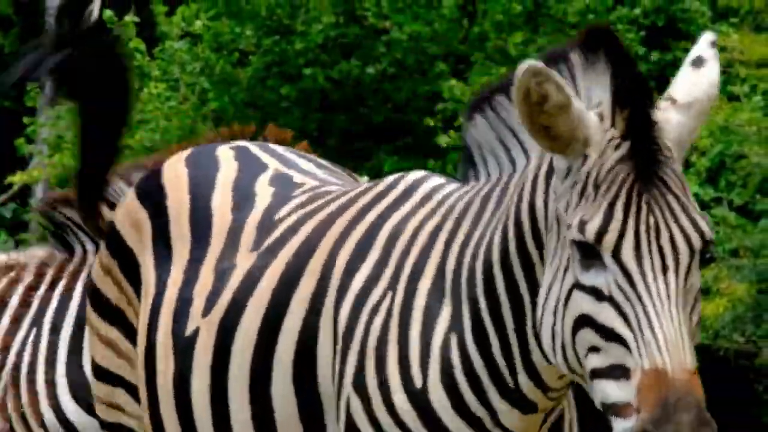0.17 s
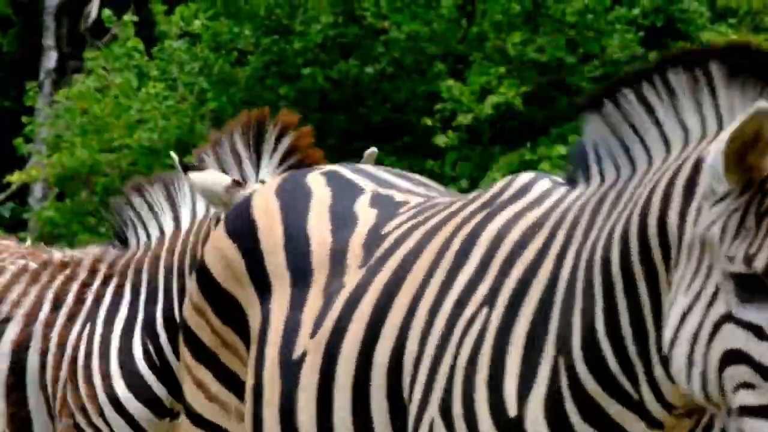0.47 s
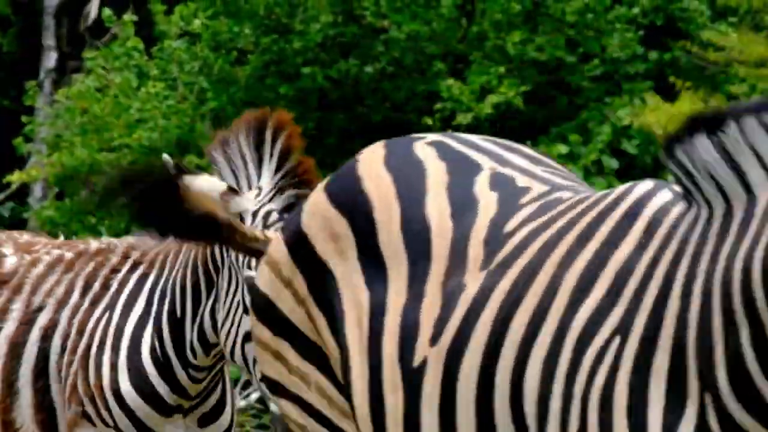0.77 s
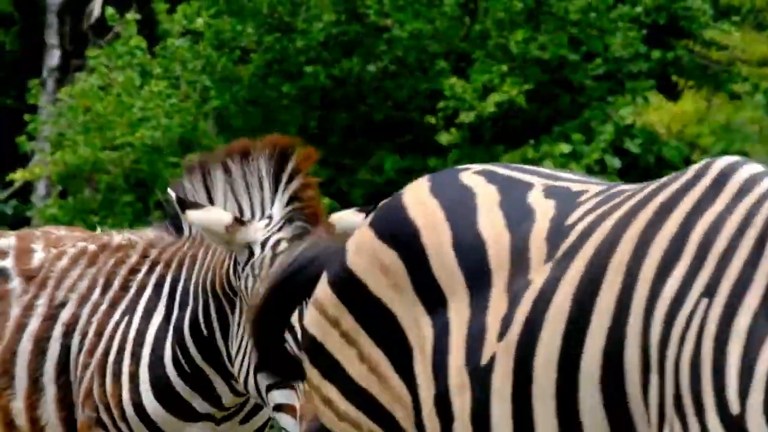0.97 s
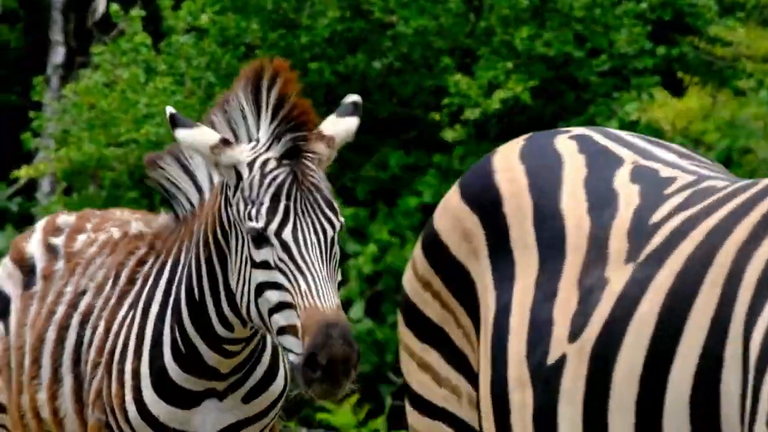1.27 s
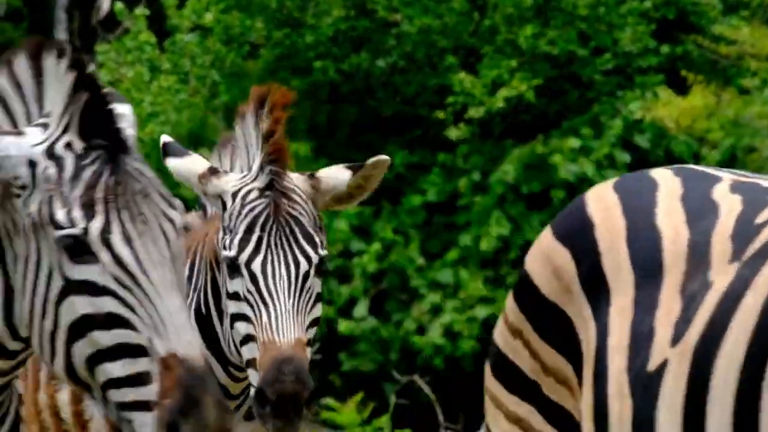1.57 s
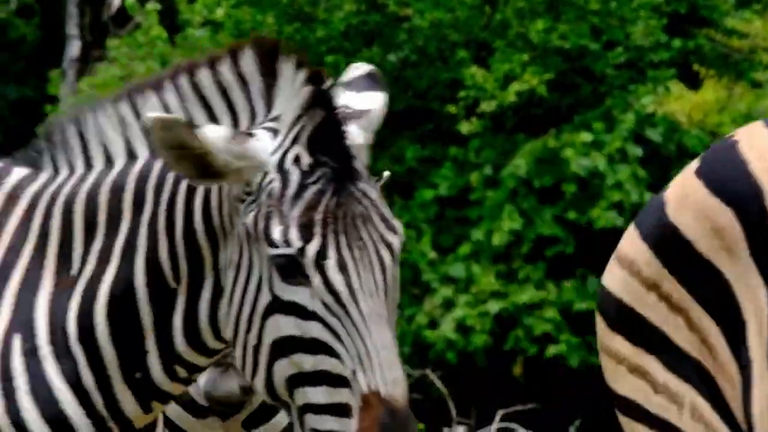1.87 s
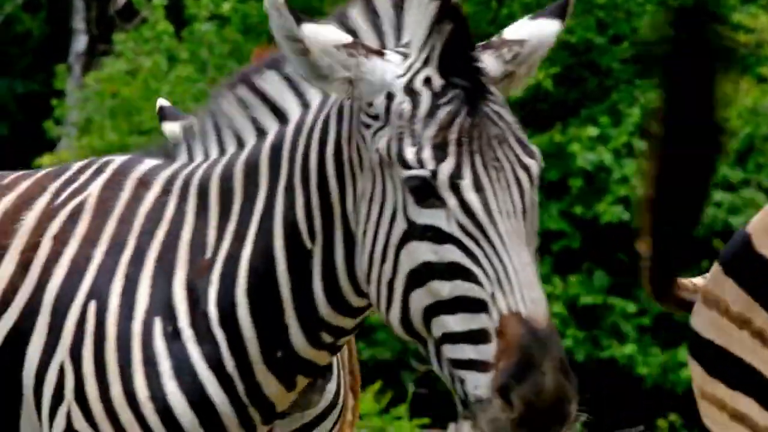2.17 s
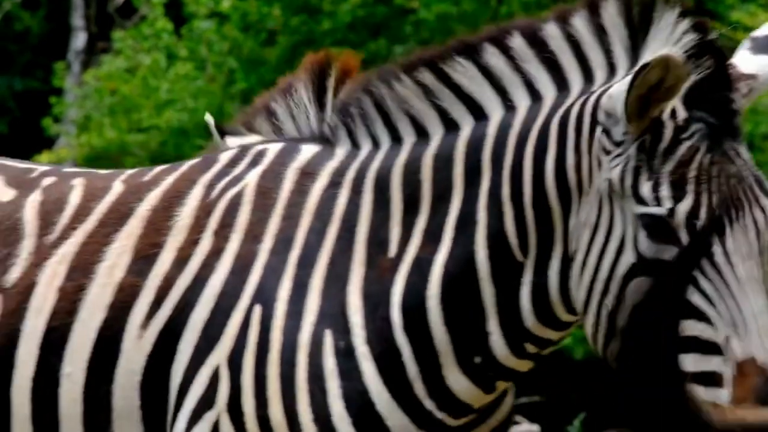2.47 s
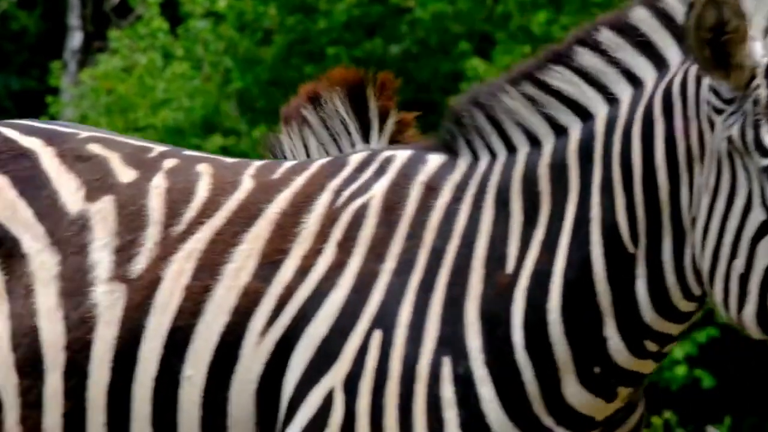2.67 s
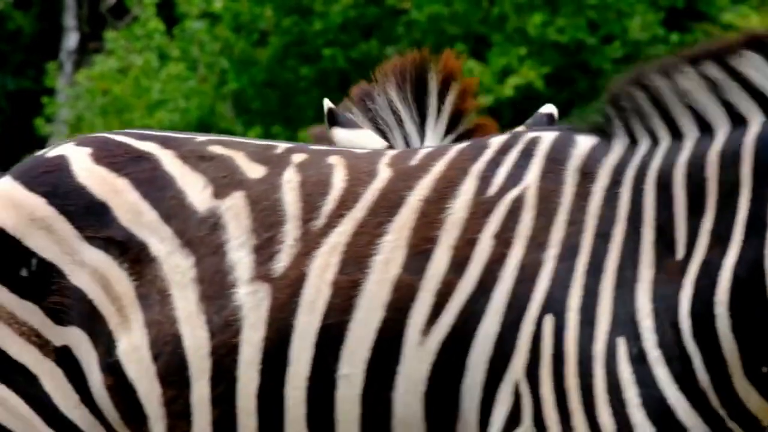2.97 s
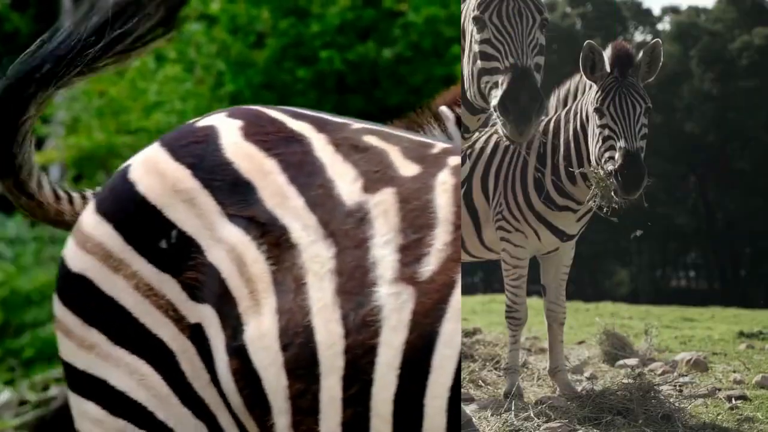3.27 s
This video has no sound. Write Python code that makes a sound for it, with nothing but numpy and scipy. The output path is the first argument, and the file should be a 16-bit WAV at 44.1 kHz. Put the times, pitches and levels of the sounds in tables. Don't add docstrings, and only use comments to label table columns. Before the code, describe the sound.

Two zebras exchange quick whooping yelps from the start almost to the end, with short breathy pauses and tiny low grunts. Fairly close stereo microphone outdoors, soft wide rustle and hiss, distant chirps, little bass.

```python
import sys
import numpy as np
from scipy import signal
from scipy.fft import rfft, irfft, next_fast_len
from scipy.io import wavfile
from scipy.ndimage import uniform_filter1d, map_coordinates

SR = 44100
rng = np.random.default_rng(int(sys.argv[2]) if len(sys.argv) > 2 else 0)


def persist_wave(psi):
    counts = np.round(np.clip(psi, -1, 1) * 32767).astype(np.int16)
    wavfile.write(sys.argv[1], SR, np.atleast_2d(counts).T)


def invert_db(level):
    return 10 ** (np.asarray(level, dtype=float) / 20)


N = 152145


def unit(x):
    return x / np.sqrt(np.mean(x ** 2) + 1e-20)


def along(points, hz):
    f, v = np.transpose(points)
    return np.interp(np.log(hz + 1), np.log(f + 1), v)


def wobble(rate_hz):
    knots = rng.standard_normal(int(N * rate_hz / SR) + 4)
    return map_coordinates(knots, [np.arange(N) * rate_hz / SR])


def filtered(x, response):
    m = next_fast_len(N + SR // 2)
    return irfft(rfft(x, m) * response(np.fft.rfftfreq(m, 1 / SR)), m)[..., :N]


def noise(spectrum):
    return unit(filtered(rng.standard_normal(N), lambda hz: invert_db(along(spectrum, hz))))


def glides(rows, flutter):
    t, out, shake = np.arange(N) / SR, np.zeros(N), wobble(150)
    for start_s, length_s, hz0, hz1, db in rows:
        u = np.clip((t - start_s) / length_s, 0, 1)
        pitch_hz = (hz0 + (hz1 - hz0) * u) * (1 + flutter * shake)
        phase = 2 * np.pi * np.cumsum(pitch_hz) / SR
        out += invert_db(db + 7.5) * np.sin(np.pi * u) ** 0.15 * np.sin(phase)
    return out


def leaves():
    # hz, density_db
    rustle_colour = [(59, -68.5), (100, -13.5), (327, -11.5), (662, -15), (982, -8.5), (1650, -12.5),
                     (3950, -17), (8690, -26), (14300, -18)]
    # hz, left_right_likeness
    likeness = [(200, 0.94), (2000, 0.94), (4000, 0.052), (8000, 0.085), (13000, .7)]
    level_db, hiss_left_db = -50.5, -1

    def mid_side(hz):
        turn = np.arccos(np.clip(along(likeness, hz), -1, 1)) / 2
        return invert_db(along(rustle_colour, hz)) * [np.cos(turn), np.sin(turn)]

    def hiss_balance(hz):
        return invert_db(np.outer([.5, -.5], hiss_left_db * (hz > 7000)))

    mid, side = filtered(rng.standard_normal((2, N)), mid_side)
    pair = filtered(np.array([mid + side, mid - side]), hiss_balance)
    return invert_db(level_db + wobble(6.0)) * unit(pair)


def birds():
    # start_s, length_s, start_hz, end_hz, level_db
    chirps = [(0, .12, 3550, 3000, -66), (.2, .03, 5400, 5200, -62), (.9, .04, 4800, 4500, -62),
              (.83, .04, 4400, 4600, -64), (.165, .05, 3000, 2995, -58), (.545, .1, 5600, 4100, -57),
              (1.64, .085, 5500, 3850, -55), (1.915, .022, 5150, 4650, -59), (1.937, .047, 4750, 3900, -58),
              (3.2, .03, 6200, 5100, -65), (3.228, .072, 5000, 3950, -53), (3.318, .022, 4950, 4550, -57),
              (3.34, .045, 4600, 3900, -57), (.06, .06, 4700, 4000, -62), (3.265, .05, 3700, 3400, -58),
              (3.3, .06, 3200, 2900, -62), (3.37, .06, 2950, 3050, -64), (1.93, .008, 4200, 3100, -56)]
    smear_t60_s, direct = .16, .55
    t = np.arange(SR // 5) / SR
    smear = rng.standard_normal((2, len(t))) * invert_db(-60 * t / smear_t60_s)
    paths = smear / np.linalg.norm(smear[0]) + direct * (t == 0)
    song = glides(chirps, flutter=.016)
    return signal.fftconvolve(song[None], paths, axes=1)[:, :N] * invert_db([[.5], [-1]])


def air_bursts(rows, spectrum):
    t = np.arange(N) / SR
    swell = sum(invert_db(db) * np.sin(np.pi * np.clip((t - start_s) / length_s, 0, 1))
                for start_s, length_s, db in rows)
    return swell * invert_db(2.8 * wobble(52)) * noise(spectrum)


def huffs():
    # start_s, length_s, level_db
    puffs = [
        (.55, 0.11, -44.5),
        (1.84, 0.089, -48),
        (2.2, 0.087, -59.5),
    ]
    # hz, level_db
    puff_colour = [(80, -28), (130, -6), (300, 6), (500, -7.5), (900, -40)]
    return air_bursts(puffs, puff_colour)


def breaths():
    # start_s, length_s, level_db
    gasps = [(0, 0.15, -55), (.53, 0.082, -51), (0.32, 0.088, -41.5), (2.14, 0.11, -51.5),
             (2.98, 0.087, -48.5), (0.776, .18, -46.5), (1.15, 0.076, -40.5), (1.817, 0.28, -42.5),
             (2.39, 0.2, -46), (2.665, 0.16, -53.5), (3.274, 0.11, -46.5)]
    # hz, level_db
    gasp_colour = [(100, -47), (250, -6.5), (700, -2), (1000, -4), (1700, 2), (2250, -0.5), (2800, -38.5),
                   (5000, -53.5)]
    return air_bursts(gasps, gasp_colour)


def grunts():
    # start_s, length_s, start_hz, end_hz, level_db
    grunt_notes = [(1.41, 0.016, 200, 220, -45.5), (1.44, 0.044, 333, 344, -46.5),
                   (2.252, 0.016, 231, 242, -46.5), (2.27, 0.055, 356, 348, -46),
                   (3.09, 0.012, 204, 228, -43.5), (3.115, 0.051, 372.3, 324, -45.5),
                   (.07, 0.051, 2178, 2220, -47), (.74, .27, 213, 199.2, -66.5),
                   (1.215, 0.012, 470, 522, -34), (2.77, 0.027, 437.7, 464, -39),
                   (2.012, 0.026, 446, 339, -44)]
    return glides(grunt_notes, flutter=0.0022)


def register(rows, bend, start_db, end_db, bright_db, hoarse_db, sag):
    # hz, level_re_fundamental_db
    overtone_levels = [(900, -19.5), (1500, -27), (2000, -19.5), (2450, -25.5), (2800, -32.5), (3300, -33),
                       (5000, -50.5)]
    # hz, level_db
    hoarse_colour = [(100, -66.5), (200, -7), (700, -3), (1500, 4.5), (2400, -15), (3200, -17.5),
                     (5000, -45), (7000, -82.5)]
    # from_s, to_s, extra_octave_db, extra_noise_db
    strained = [(.21, .25, 13, 3), (.25, .3, 18, 3), (.3, .33, 10, 0), (.33, .36, 8, 2), (.5, .56, 4, 14),
                (1.19, 1.3, 0, 8), (1.39, 1.46, 0, 7), (1.81, 1.83, 0, 12), (2, 2.03, 0, 9),
                (2.04, 2.06, 0, 7), (2.1, 2.15, 6, 8), (2.23, 2.4, 0, 9), (2.6, 2.63, 6, 5),
                (2.76, 3.03, 0, 8), (3.06, 3.12, 0, 9)]
    edge_s, jitter_depth, shimmer_db, breakup_db, fourth_db = .007, .006, 32, 4, -12
    out, rasp = np.zeros(N), noise(hoarse_colour)
    jitter, shimmer, breakup = wobble(150), wobble(70), wobble(110)
    for start_s, length_s, hz0, hz1, db in rows:
        strains = [(octave, rough) for t0, t1, octave, rough in strained if t0 < start_s < t1]
        octave_db, rough_db = np.sum(strains + [(0, 0.0047)], axis=0)
        t = np.arange(int((length_s + 2.26 * edge_s) * SR)) / SR
        u = t / length_s
        first = int(start_s * SR)
        cut = slice(first, first + len(t))

        glide_hz = hz0 + (hz1 - hz0) * np.expm1(-bend * u) / np.expm1(-bend)
        pitch_hz = glide_hz * (1 - sag * u ** 3 + jitter_depth * invert_db(rough_db) * jitter[cut])
        phase = 2 * np.pi * np.cumsum(pitch_hz) / SR

        overtones = np.zeros(len(t))
        for k in range(2, 5):
            extra_db = octave_db * (k == 2) + fourth_db * (k == 4)
            overtones += invert_db(along(overtone_levels, k * pitch_hz) + extra_db) * np.sin(k * phase + k)
        dull_onset_db = 0.7 * start_db * np.clip(1 - u, 0, 1) ** 2
        tone = np.sin(phase) + invert_db(bright_db + dull_onset_db + breakup_db * breakup[cut]) * overtones

        gate = (1 + 0.74 * np.sin(phase)) * np.sin(np.pi * t / t[-1])
        voice = np.sqrt(2) * tone + invert_db(hoarse_db + rough_db) * gate * 1.56 * rasp[cut]

        edge = np.sin(np.pi / 2 * np.clip(np.minimum(t, (t[-1] - t) / 2) / edge_s, 0, 1)) ** 2
        onset_db = start_db * np.clip(1 - 2.5 * u, 0, 1)
        dips_db = shimmer_db * invert_db(hoarse_db + rough_db / 2) ** 0.58 / 4 * shimmer[cut] ** 2
        out[cut] += edge * invert_db(db + onset_db + end_db * u ** 2 - dips_db) * voice
    return out


def barks():
    # start_s, length_s, start_hz, end_hz, peak_db
    chest = [(.214, 0.051, 511, 869, -27), (.376, 0.048, 580.5, 814, -22.5), (.597, 0.06, 437.6, 894, -21),
             (1.006, 0.046, 471.5, 845, -23.5), (1.186, 0.034, 550, 853, -27.5),
             (1.21, 0.037, 718, 705.7, -22), (1.243, 0.029, 701, 899, -20), (1.395, 0.032, 578, 876, -25.5),
             (1.418, 0.027, 727, 776, -23), (1.669, .05, 490, 829, -24), (1.902, 0.067, 420.6, 889, -24),
             (2.009, 0.052, 661.7, 818, -23.5), (2.236, 0.0329, 667, 803, -25),
             (2.262, 0.034, 699, 758, -29), (2.466, 0.046, 392, 771, -30), (2.768, 0.05, 427, 804, -32),
             (2.85, 0.052, 602.5, 773, -26), (3.067, 0.035, 491, 807, -29.5),
             (3.098, 0.032, 734, 775, -22.5)]
    # start_s, length_s, start_hz, end_hz, peak_db
    head = [(.268, 0.055, 935, 988, -23), (.427, 0.095, 965, 1126, -16), (.652, 0.089, 965, 1162, -16),
            (1.05, 0.076, 933, 1106, -16.5), (1.232, 0.1, 883, 972.5, -21), (1.27, 0.067, 969, 1129, -18.5),
            (1.445, 0.073, 886, 997.4, -19), (1.716, 0.089, 925, 1097, -16.5),
            (1.965, 0.08, 1023, 1084, -20), (2.05, 0.058, 874, 1015, -19), (2.098, 0.032, 1040, 1043, -19),
            (2.278, 0.037, 894, 995, -17), (2.318, 0.053, 1026, 1189, -20.5), (2.514, 0.11, 906, 1016, -20),
            (2.815, 0.065, 888, 1033, -23), (2.895, 0.033, 923, 1024, -19), (2.917, 0.041, 980, 1173, -17),
            (2.96, 0.021, 1106, 1074, -16.5), (3.085, 0.11, 862, 1115, -29.5),
            (3.14, 0.053, 913, 1062, -19)]
    # start_s, length_s, start_hz, end_hz, peak_db
    falls = [
        (.313, 0.03, 918, 555.6, -21),
        (.343, 0.038, 549, 483, -28),
        (.53, 0.073, 862, 292, -39.5),
        (1.293, 0.03, 936, 642, -22),
        (1.322, 0.049, 502, 430, -34.5),
        (1.822, 0.035, 916, 400, -42.5),
        (2.124, .056, 1004, 450.5, -30.5),
        (2.615, 0.038, 959, 619, -34),
        (2.975, 0.047, 947, 488, -31.5),
    ]
    # time_s, depth_db
    catches = [(0.264, -16), (0.319, -4.5), (0.376, -13), (.61, -10.5), (0.621, -5.5), (.655, 1),
               (1.046, -7.5), (1.056, -0.5), (1.216, -8), (1.413, -9.5), (1.474, -19), (1.92, -24),
               (1.967, 2), (1.983, -13), (2.127, -4.5), (2.139, 0), (2.261, -13), (2.317, -20),
               (2.342, -17), (2.357, -19), (2.376, -21), (1.52, -6), (2.618, -5), (2.819, -2), (2.851, -18),
               (2.915, -9.5), (2.941, -20), (2.959, -29), (2.972, -30), (3.142, -11.5)]
    # centre_hz, width_hz, level_db
    throat = [
        (755, 25, -8),
    ]
    catch_s, ground_s, ground_gain = 0.0018, .00322, -.35
    t = np.arange(N) / SR
    out = register(chest, bend=.35, start_db=-8, end_db=0, bright_db=7, hoarse_db=-23, sag=0)
    out += register(head, bend=4, start_db=-6, end_db=-9, bright_db=-4, hoarse_db=-33, sag=.025)
    out += register(falls, bend=.6, start_db=0, end_db=-9, bright_db=3, hoarse_db=-21, sag=0)
    out = out * invert_db(sum(db * np.exp(-((t - time_s) / catch_s) ** 2) for time_s, db in catches))

    def throat_and_ground(f):
        ring = sum(invert_db(db) * 1j * f * w / (c * c - f * f + 1j * f * w) for c, w, db in throat)
        bounce = ground_gain * np.exp(-2j * np.pi * f * ground_s)
        return (1 + ring) * (1 + bounce)

    return filtered(out, throat_and_ground)


def trees(x):
    # delay_s, level_db
    echoes = [
        (.056, -18.5),
        (.11, -34),
    ]
    t60_s, tail_db, tail_side_db, spread_s = .4, -19, -12, .012
    t = np.arange(SR // 2) / SR
    tail = rng.standard_normal((2, len(t))) * invert_db(-60 * t / t60_s)
    mid, side = tail / np.linalg.norm(tail[0]) * invert_db([[tail_db], [tail_db + tail_side_db]])
    for delay_s, db in echoes:
        clump = rng.standard_normal(len(t)) * np.exp(-((t - delay_s) / spread_s) ** 2)
        mid += invert_db(db) * clump / np.linalg.norm(clump)
    return x + signal.fftconvolve(x[None], np.array([mid + side, mid - side]), axes=1)[:, :N]


def treble_gaps(x):
    # hz, rarity_deviations
    gap_rarity = [(6000, 9), (7200, 1.3), (8500, .5), (11000, .7), (13500, 1.3)]
    hz, t, z = signal.stft(x, SR, nperseg=2048)
    field = uniform_filter1d(rng.standard_normal((33, len(t))), size=2, axis=0)
    field = unit(uniform_filter1d(field, size=3, axis=1))
    keep = field[np.arange(len(hz)) // 32] < along(gap_rarity, hz)[:, None]
    return signal.istft(z * np.where(keep, 1, .02), SR, nperseg=2048)[1][:, :N]


def microphone_rumble():
    # hz, level_db
    rumble_colour = [(20, -3), (50, 5.5), (100, -9), (200, -50.5)]
    mid = invert_db(-88) * noise(rumble_colour)
    side = invert_db(-88 - 18) * noise(rumble_colour)
    return np.array([mid + side, mid - side])


def scene():
    herd = barks() + grunts() + breaths() + huffs()
    return trees(herd) + birds() + leaves()


def band_limit(x):
    return signal.sosfilt(signal.butter(12, 15590, fs=SR, output="sos"), x)


def record(dry):
    low_cut_hz, top_hz = 135, 14250
    cut = filtered(dry, lambda hz: (hz < top_hz) / np.sqrt(1 + (low_cut_hz / (hz + 1)) ** 14))
    mix = treble_gaps(cut) + microphone_rumble()
    return band_limit(mix)


dry = scene()
out = record(dry)
persist_wave(out)
```